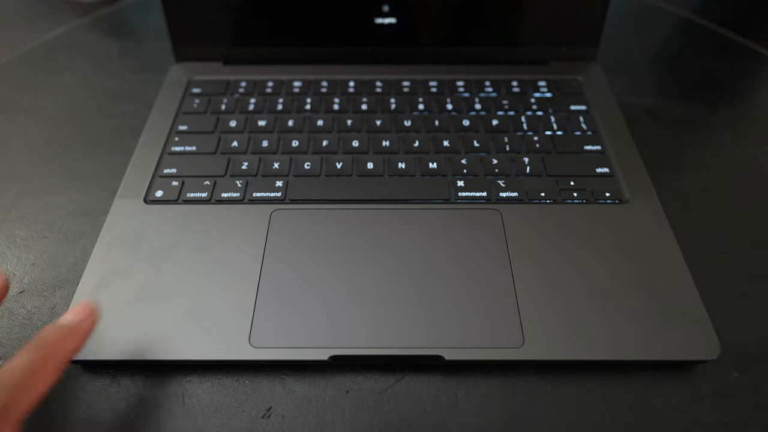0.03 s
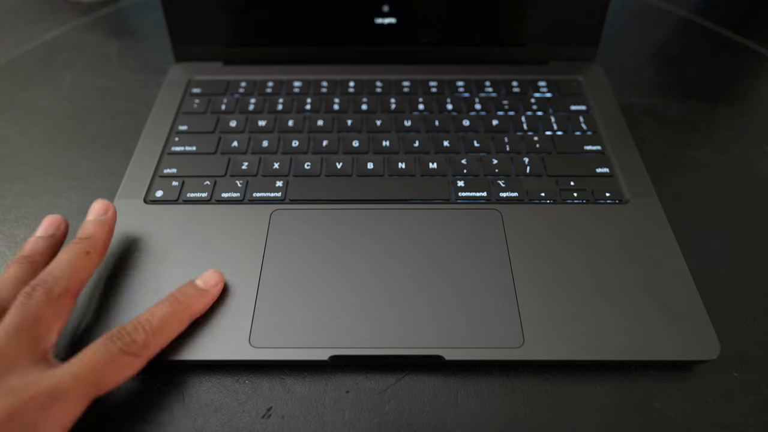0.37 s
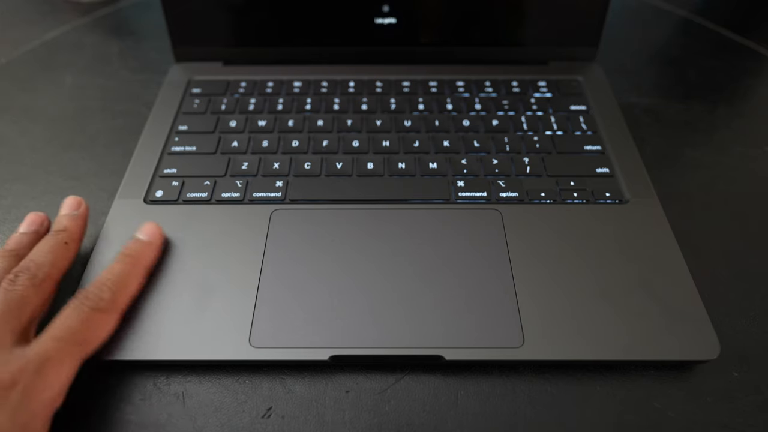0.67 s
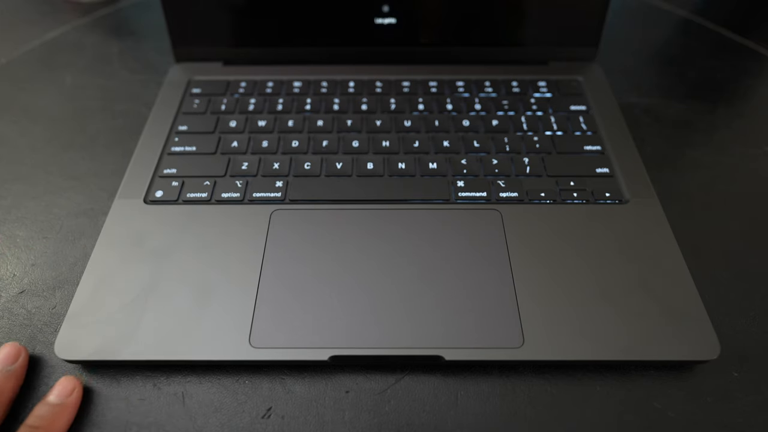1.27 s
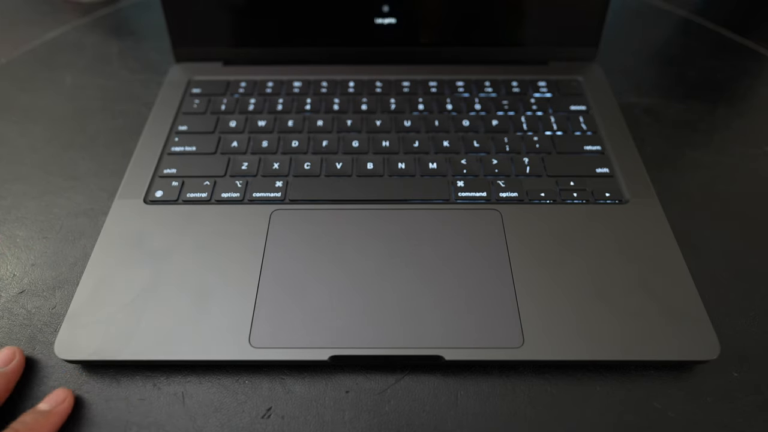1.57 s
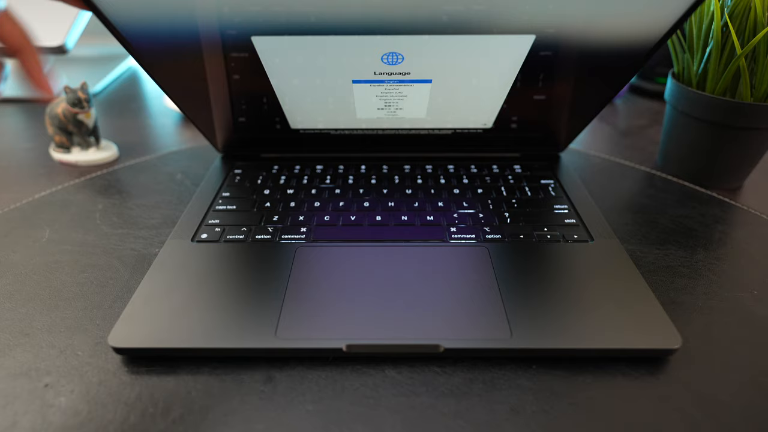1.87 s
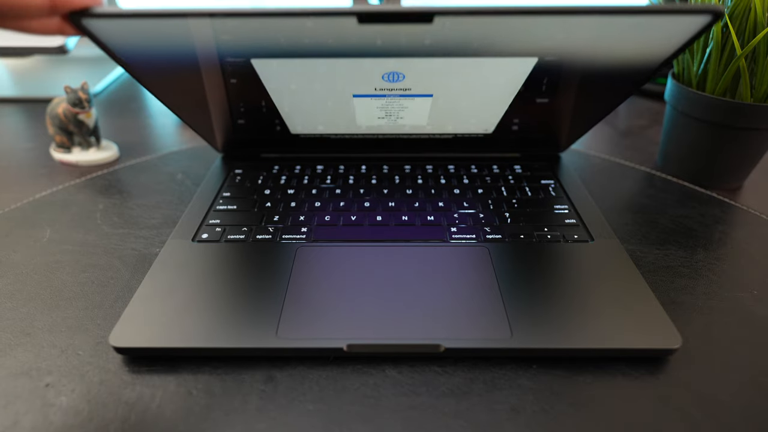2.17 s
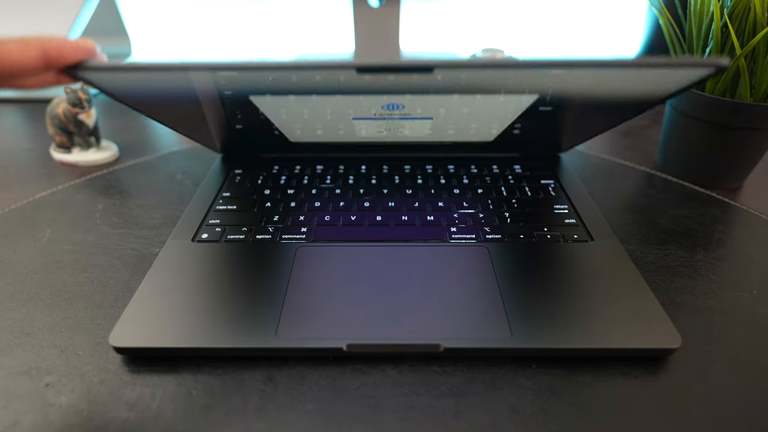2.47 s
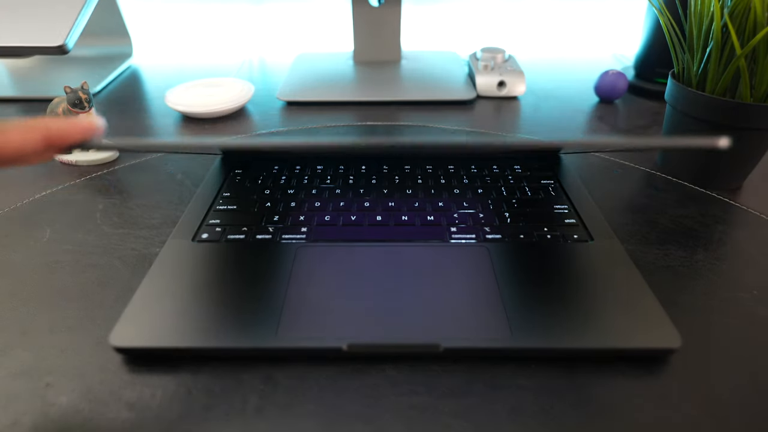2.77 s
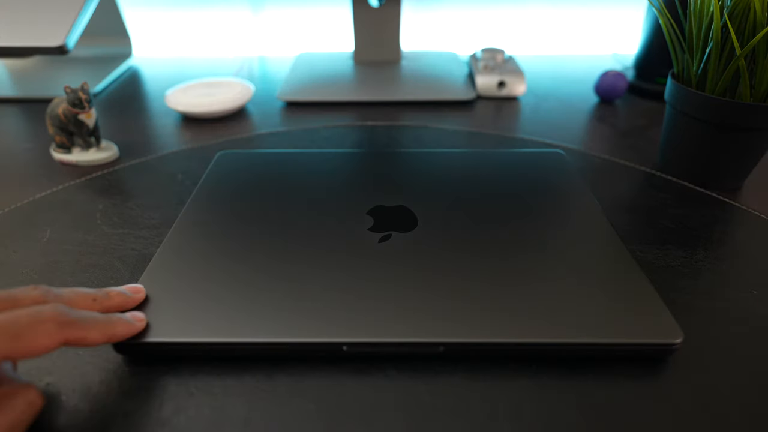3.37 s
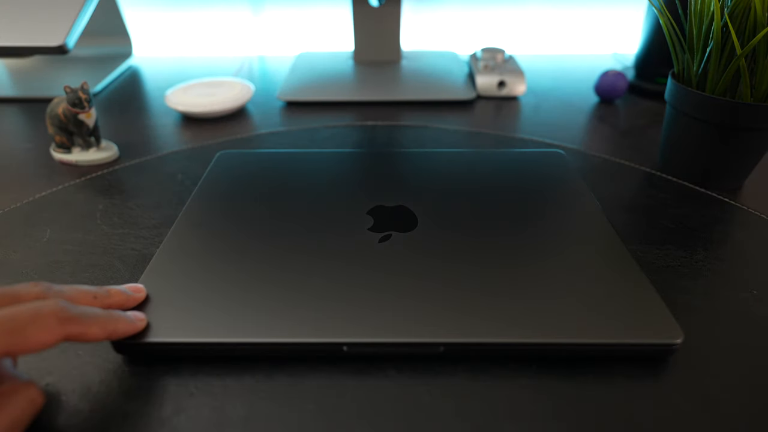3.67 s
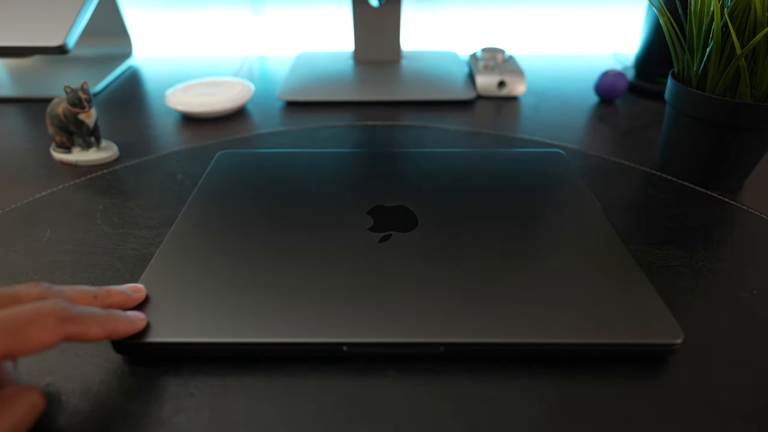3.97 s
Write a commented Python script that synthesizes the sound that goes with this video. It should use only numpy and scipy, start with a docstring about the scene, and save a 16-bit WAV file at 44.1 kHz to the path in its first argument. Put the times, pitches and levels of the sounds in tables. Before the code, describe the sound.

A laptop lid shuts with a dull thud at about 3.3 seconds, briefly shaking the keys and desk, just after a faint tick and groan from the hinge and a puff of air. Earlier, from 0.4 seconds, a hand swishes over the metal case, slipping off with a click near 1.3 seconds, then lightly brushes the lid around 1.7. Everything is close, over quiet room tone and a low rumble.

```python
"""A laptop is stroked and shut on a desk in a quiet room. Skin hisses over the metal palm rest in thousands
of tiny slips, slides along the edge and comes off with a click that rings the case. The hand brushes
the lid and lowers it: the hinge ticks and groans, air is squeezed out of the gap, and the lid lands
with a dull thud that shakes keys and desk. Room tone and a deep rumble lie underneath."""
import sys
import numpy as np
from scipy import signal
from scipy.fft import rfft, irfft
from scipy.io import wavfile

SR = 44100
rng = np.random.default_rng(int(sys.argv[2]) if len(sys.argv) > 2 else 0)


def store_wav(level_fs):
    """Save 16-bit WAV to argv[1]."""
    pcm = np.round(np.clip(np.atleast_2d(level_fs), -1, 1) * 32767)
    wavfile.write(sys.argv[1], SR, pcm.T.astype(np.int16))


N = 176400
TIME = np.arange(N) / SR

# rubbing on flat metal, for palm and hinge: f/Hz, level/dB
RUB_COLOUR = [(300, -22), (1000, -7), (1850, -4), (2800, -8), (4000, 2), (4800, 1), (5400, -2.5),
              (6000, 0.5), (6800, -3), (8500, 0.5), (10800, -10.5), (13200, -6.5), (16000, -15.5)]


def from_db(db):
    """Decibels to gain."""
    return 10 ** (np.asarray(db) / 20)


def rms_one(x):
    """Scale to an rms of one."""
    return x / np.sqrt(np.mean(x ** 2) + 1e-20)


def level_curve(rows):
    """A fader ride through points of t/s, level/dB."""
    return from_db(np.interp(TIME, *np.transpose(rows)))


def swells(rows):
    """Bell-shaped swells, each with its own rise and fall, added in power."""
    power = 0
    for peak_s, rise, fall, db in rows:
        width = np.where(TIME < peak_s, rise, fall)
        power += from_db(db) ** 2 * np.exp(-2 * ((TIME - peak_s) / width) ** 2)
    return np.sqrt(power)


def decay(start, db, t60):
    """A hard attack and an exponential tail."""
    return (TIME > start) * from_db(db) * np.exp(-np.log(1000) * np.abs(TIME - start) / t60)


def coloured(x, colour):
    """EQ a steady noise through points of f/Hz, level/dB; rms one."""
    hz, db = np.transpose(colour)
    log_hz = np.log(np.fft.rfftfreq(N, 1 / SR) + 1e-9)
    gain = from_db(np.interp(log_hz, np.log(hz), db))
    return rms_one(irfft(rfft(x) * gain, N))


def noise(colour):
    """Steady noise of the given colour; rms one."""
    return coloured(rng.standard_normal(N), colour)


def soften(x, hz):
    """Two-pole low-pass."""
    return signal.sosfilt(signal.butter(2, hz, fs=SR, output="sos"), x + 1e-18)


def resonance(x, hz, width_hz):
    """A resonance with gain one at its peak."""
    r = np.exp(-np.pi * width_hz / SR)
    poles = [1, -2 * r * np.cos(2 * np.pi * hz / SR), r * r]
    return signal.lfilter(np.array([1, 0, -1]) * (1 - r * r) / 2, poles, x)


def pitched_rub(hz, width_hz):
    """Rough rubbing noise in one resonance, dull above it; rms one."""
    return rms_one(soften(resonance(rng.standard_normal(N), hz, width_hz), 2 * hz))


def friction(colour, slips_per_s=14000, spread_db=0.5, flicker_db=0.5):
    """Thousands of tiny slips of uneven size merge into a slightly flickering hiss."""
    slips = (rng.random(N) < slips_per_s / SR) * rng.standard_normal(N)
    slips *= from_db(spread_db * rng.standard_normal(N))
    flicker = rms_one(soften(rng.standard_normal(N), hz=45))
    return coloured(slips, colour) * from_db(flicker_db * flicker)


def struck(hits, modes):
    """Every hit sets the modes ringing, neighbours in opposite polarity."""
    impulses = np.zeros(N)
    for hit_s, db in hits:
        impulses[int(hit_s * SR)] -= from_db(db)
    ring = np.zeros(N)
    for k, (hz, db, t60) in enumerate(modes):
        r = np.exp(-np.log(1000) / (t60 * SR))
        poles = [1, -2 * r * np.cos(2 * np.pi * hz / SR), r * r]
        ring += (-1) ** k * from_db(db) * signal.lfilter([.5, 0, -.5], poles, impulses + 1e-18 * TIME)
    return ring


def room_tone():
    """Steady air with a low drone over a wavering rumble; a faint hiss fades as the hand comes in."""
    # colours of the three beds: f/Hz, level/dB
    air_colour = [(50, -3), (90, -4.5), (140, 0), (180, -6), (205, 6.5), (240, -5), (350, -5), (450, -10),
                  (600, -13.5), (780, -9), (1100, -14.5), (1600, -22), (2500, -29), (5000, -37.5),
                  (9000, -43), (16000, -52)]
    rumble_colour = [(10, -23.5), (21, 4), (29, 18), (40, -12.5), (60, -3.5), (120, -48.5)]
    hiss_colour = [(300, -6), (1500, 3), (3000, -5), (5000, -6.5), (8000, -13), (16000, -30)]
    # the rumble's wavering: t/s, level/dB
    rumble_ride = [(0, -50), (.3, -53), (.42, -51), (.52, -62), (1.2, -54.5), (1.42, -46), (1.7, -54),
                   (2.1, -57), (2.5, -54.5), (2.9, -50.5), (3.02, -57), (3.6, -52), (4, -57.5)]
    # the opening hiss: t/s, rise/s, fall/s, level/dB
    hiss_swell = [(.02, .05, 0.22, -70)]
    air = from_db(-54) * noise(air_colour)
    rumble = level_curve(rumble_ride) * noise(rumble_colour)
    return air + rumble + swells(hiss_swell) * noise(hiss_colour)


def desk_bumps():
    """The hand's weight bumps the desk, soft and low."""
    # bumps: t/s, rise/s, fall/s, level/dB
    bumps = [(.185, 0.024, .025, -50.5), (.40, 0.042, .035, -47.5), (1.32, 0.06, 0.052, -45),
             (2.63, 0.028, 0.037, -49)]
    # their bassy body: f/Hz, level/dB
    colour = [(20, -11), (42, 0), (80, -10), (130, -2.5), (200, -15), (400, -23), (1000, -69)]
    return swells(bumps) * noise(colour)


def edge_slide():
    """Fingers slide along the edge; the skin catches as they land and just before they slip off."""
    # the slide: t/s, level/dB
    ride = [(.35, -93.5), (.49, -55.5), (.64, -62.5), (.72, -55.5), (.81, -59), (.88, -56.5), (1.0, -53),
            (1.09, -55.5), (1.16, -53.5), (1.24, -54.5), (1.31, -51), (1.40, -81)]
    # skin on the edge: f/Hz, level/dB
    colour = [(300, -2.5), (1300, -1.5), (2300, -6.5), (3700, -4.5), (4200, 2.5), (4900, 1), (5500, -3.5),
              (6400, -9), (8600, -13), (10500, -21), (14000, -25), (16000, -34)]
    # skin catching: t/s, rise/s, fall/s, level/dB
    catches = [(.362, .005, .012, -60), (.40, .005, .015, -61), (1.250, .006, .006, -44.5)]
    touching = (TIME > ride[0][0]) & (TIME < ride[-1][0])
    drag = swells(catches) * pitched_rub(hz=1100, width_hz=600)
    return drag + level_curve(ride) * touching * friction(colour)


def palm_strokes():
    """Skin swishes over the palm rest; a fingertip sings at the height of the two strongest strokes."""
    # strokes, peaking where the hand is fastest, and squeaks: t/s, rise/s, fall/s, level/dB
    strokes = [(.42, .05, .04, -70), (.505, 0.044, 0.051, -57), (.565, 0.052, 0.03, -46),
               (.718, 0.041, 0.059, -49), (.87, .04, 0.028, -58), (.99, 0.084, 0.13, -56)]
    squeaks = [(.55, 0.018, 0.029, -55), (.722, 0.029, 0.0082, -47)]
    swish = swells(strokes) * friction(RUB_COLOUR)
    return swish + swells(squeaks) * pitched_rub(hz=5340, width_hz=150)


def case_clicks():
    """The metal case rings briefly as the fingers slip off and as the hinge ticks."""
    # clicks: t/s, level/dB
    clicks = [(1.140, -19.5), (1.2579, 3.5), (1.2596, -0.5), (3.1593, -25.5), (3.1664, -25.5)]
    # modes of the case: f/Hz, level/dB, t60/s
    modes = [(1320, -34.5, 0.014), (2050, -39, 0.013), (2550, -33.5, 0.01), (3300, -31.5, .01),
             (4130, -25, 0.0075), (4960, -26.5, 0.011), (5650, -30.5, 0.0087), (6730, -29.5, 0.0032),
             (8400, -31, 0.0027), (13400, -34, 0.001)]
    return soften(struck(clicks, modes), hz=12400)


def base_knocks():
    """The base knocks softly on its rubber feet."""
    # knocks: t/s, level/dB
    knocks = [(1.2596, 0), (1.2805, -7), (2.37, -47), (2.575, -25), (3.1665, -15.5)]
    # modes of the base: f/Hz, level/dB, t60/s
    modes = [(116, -33, 0.16), (218, -23, 0.044), (296, -30, 0.075), (427, -28, 0.034), (860, -34, 0.026)]
    return soften(struck(knocks, modes), hz=1090)


def lid_brush():
    """Skin brushes lightly over the lid."""
    # brushes: t/s, rise/s, fall/s, level/dB
    brushes = [(1.70, 0.11, 0.15, -58), (1.705, 0.017, 0.02, -55)]
    # skin on the lid: f/Hz, level/dB
    colour = [(500, 5), (2000, -11.5), (3800, -9), (5100, -1.5), (6500, -12), (8000, -16), (11000, -25),
              (16000, -34)]
    return swells(brushes) * friction(colour)


def hinge():
    """The closing hinge groans faintly, then rubs."""
    # groan and rubs: t/s, rise/s, fall/s, level/dB
    groans = [(3.172, 0.0096, 0.05, -52)]
    rubs = [(3.24, 0.021, 0.017, -56), (3.28, .04, 0.06, -65.5)]
    groan = swells(groans) * pitched_rub(hz=376, width_hz=360)
    return groan + swells(rubs) * soften(friction(RUB_COLOUR), hz=7000)


def air_puff():
    """Air squeezed out from under the lid sounds the resonances of the gap."""
    # the puff: t/s, rise/s, fall/s, level/dB
    puffs = [(3.227, 0.0051, 0.056, -44)]
    # resonances of the gap: f/Hz, width/Hz, level/dB
    gap = [(554, 50, -4.5), (866, 48, -1.5), (1097, 79, -0.5), (1260, 62, -7), (1800, 91, -13)]
    flow = soften(rng.standard_normal(N), hz=1200)
    breath = sum(from_db(db) * resonance(flow, hz, width) for hz, width, db in gap)
    return swells(puffs) * rms_one(breath)


def lid_landing(gasket_hz=3480):
    """The lid thuds onto its gasket, which crunches for an instant; desk, keys and panels shake."""
    # one corner lands just after the other: t/s, level/dB
    corners = [(3.3093, 0.5), (3.31095, 2)]
    # modes of lid and desk: f/Hz, level/dB, t60/s
    lid_modes = [(334, -20, 0.056), (476, -21.5, 0.055), (617, -11, 0.018), (818, -14.5, 0.026),
                 (1087, -10.5, 0.016), (1587, -17.5, 0.016), (2030, -18.5, 0.014), (3190, -18, 0.005),
                 (3680, -21, 0.01), (5100, -22, .007)]
    desk_modes = [(29.4, -38.5, 1), (42, -41, 1.0), (63, -30, 0.4), (127.7, -39.5, 0.57), (166, -31, 0.1),
                  (192, -36.5, 0.28), (311, -22.5, 0.12)]
    # colour of the crunch and the shivering keys and panels: f/Hz, level/dB
    rattle_colour = [(150, 2), (400, -8), (850, 1), (1500, -7.5), (2100, -9.5), (2550, -18.5), (3100, -19),
                     (3900, -25.5), (5200, -28.5), (7000, -38), (9000, -42.5), (12000, -56), (16000, -56)]
    ring = struck(corners, lid_modes) + struck(corners[:1], desk_modes)  # the desk takes one blow
    thud = soften(soften(ring, gasket_hz), gasket_hz)
    landing_s = corners[0][0]
    crunch = decay(landing_s, db=-17, t60=0.027)
    shiver = decay(landing_s, db=-28.5, t60=0.41)
    return thud + soften((crunch + shiver) * noise(rattle_colour), hz=6000)


def room_reverb(x, predelay_s=0.0013, build_s=0.0017):
    """Dense reflections build up in a few milliseconds and die away, the lows last."""
    # reverb bands: f/Hz, level/dB, t60/s
    bands = [(59, -21, 0.48), (195, -4, 0.34), (485, -8, 0.25), (1000, -13.5, 0.33), (2100, -7.5, 0.3),
             (4570, -14.5, 0.43), (8000, -10, 0.26), (14000, -28, 0.2)]
    hz, wet_db, t60 = np.transpose(bands)
    t = np.maximum(TIME[:SR] - predelay_s, 0)
    scatter = rfft(rng.standard_normal(SR))
    log_hz = np.log(np.fft.rfftfreq(SR, 1 / SR) + 1e-9)
    response = 0
    for share, db, decay_s in zip(np.eye(len(hz)), wet_db, t60):
        envelope = (1 - np.exp(-t / build_s)) * np.exp(-np.log(1000) * t / decay_s)
        band = irfft(scatter * np.interp(log_hz, np.log(hz), share), SR)
        response += from_db(db) * band * envelope / np.sqrt(np.sum(envelope ** 2))
    return signal.fftconvolve(x, response)[:N]


def scene():
    """The laptop up close with its reverb, over the room tone, in mono."""
    hand = desk_bumps() + edge_slide() + palm_strokes() + lid_brush()
    laptop = hand + case_clicks() + base_knocks() + hinge() + air_puff() + lid_landing()
    return (laptop + room_reverb(laptop) + room_tone())[None]


def record(dry):
    """A steep high cut takes off the very top."""
    cutoff_hz = 15750
    return signal.sosfilt(signal.ellip(12, .1, 90, cutoff_hz, fs=SR, output="sos"), dry)


dry = scene()
out = record(dry)
store_wav(out)
```